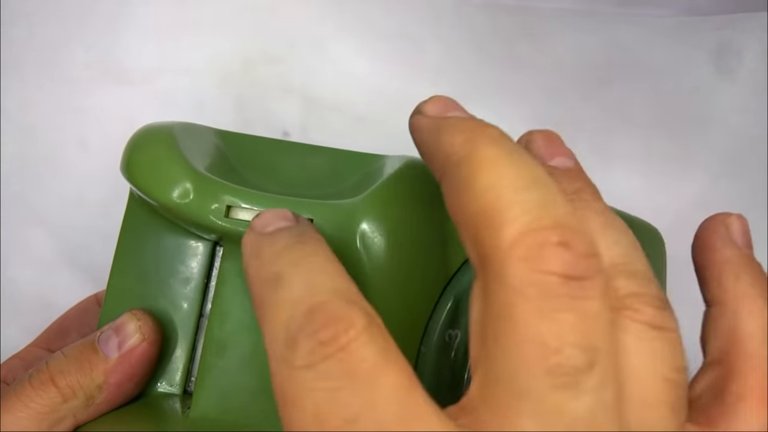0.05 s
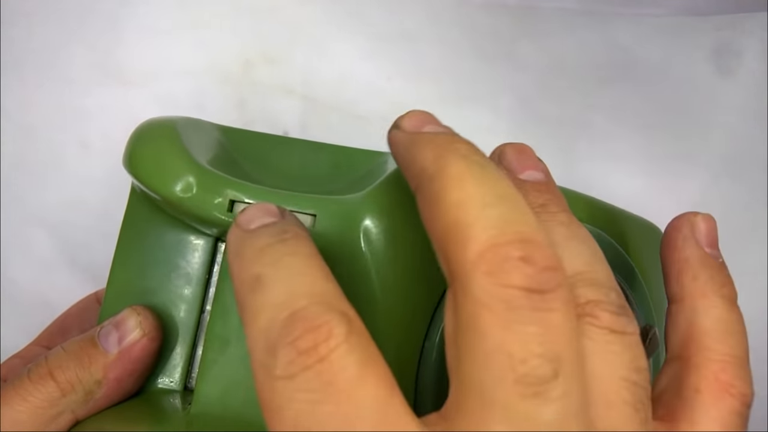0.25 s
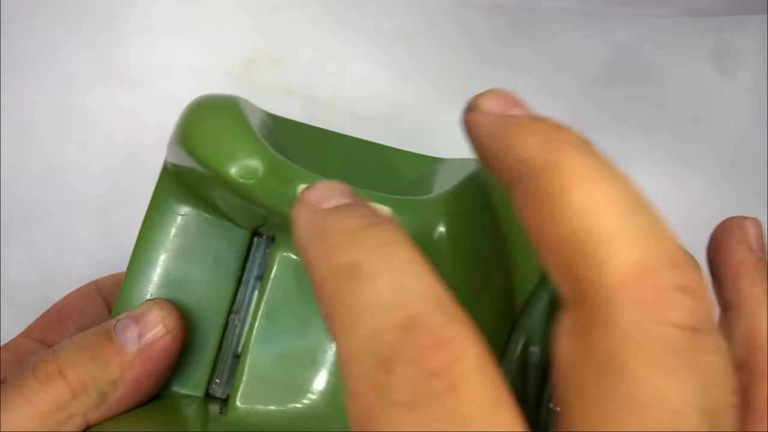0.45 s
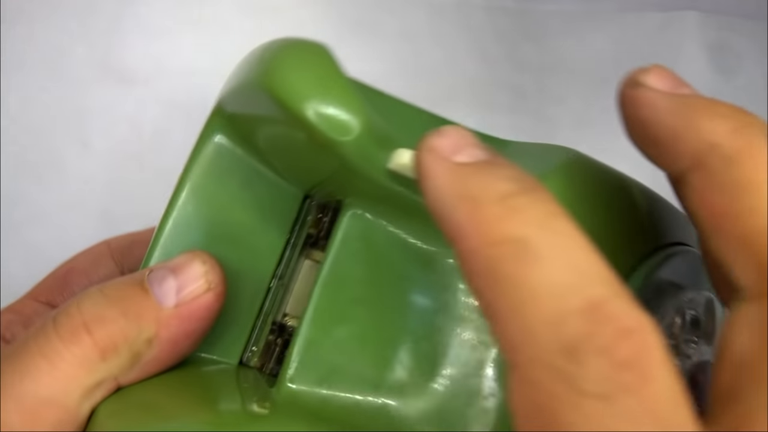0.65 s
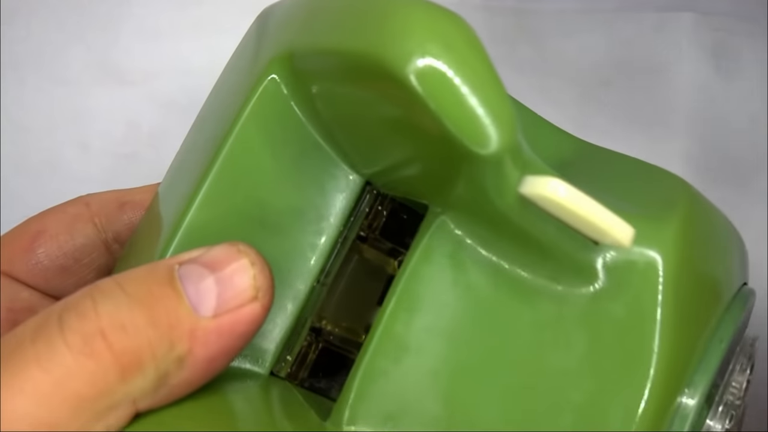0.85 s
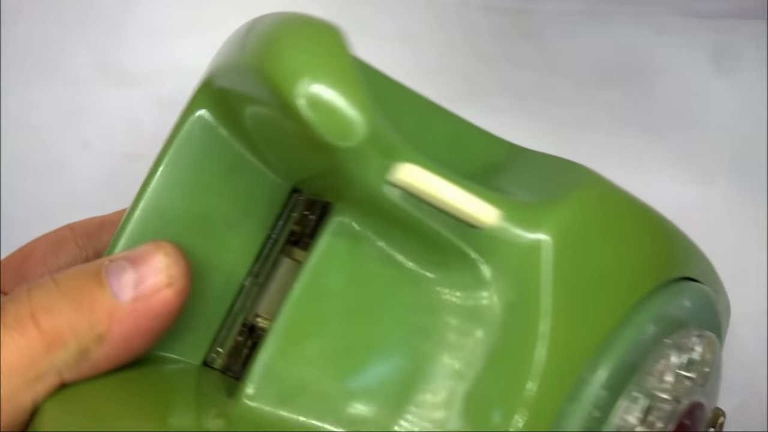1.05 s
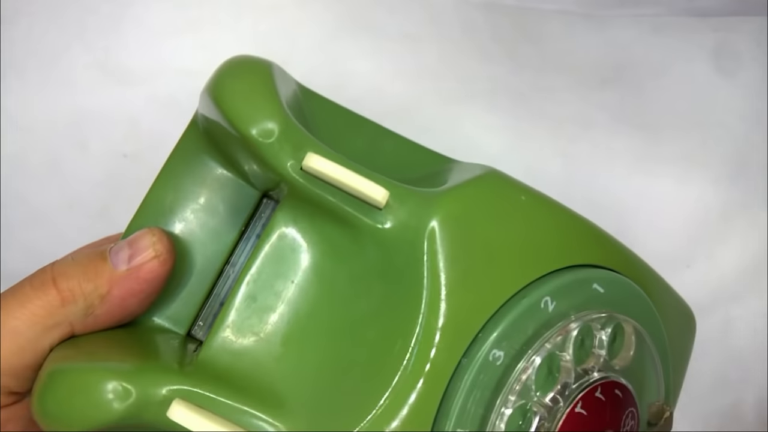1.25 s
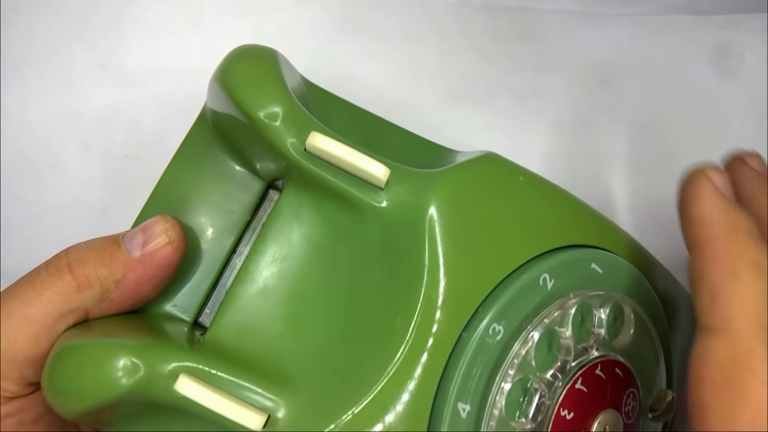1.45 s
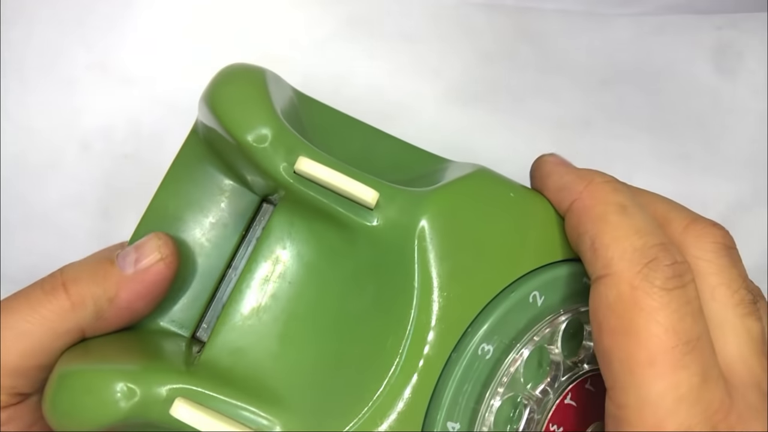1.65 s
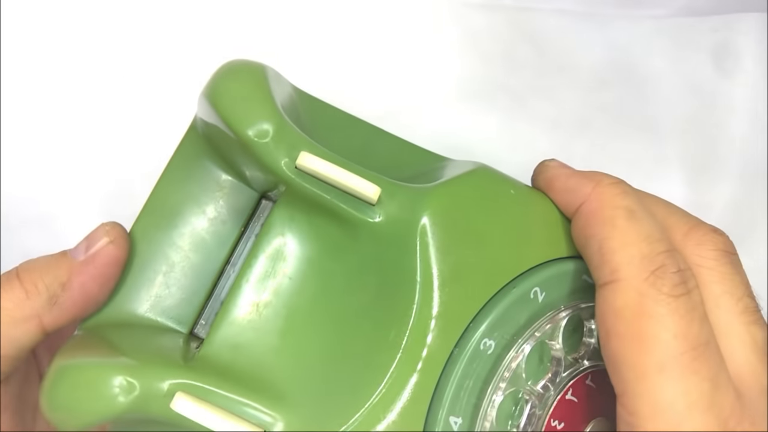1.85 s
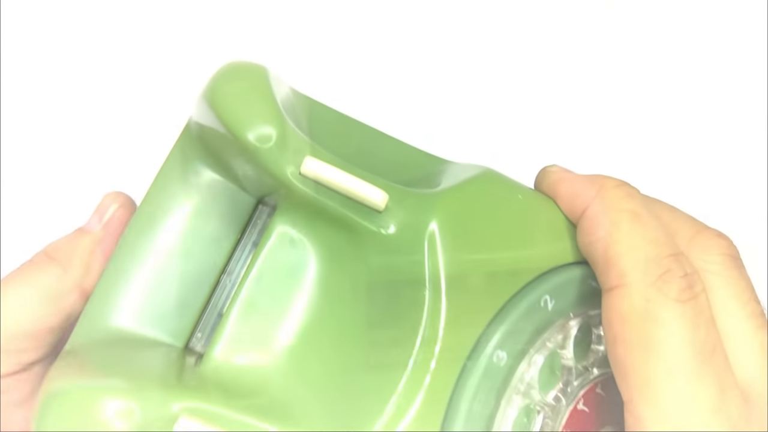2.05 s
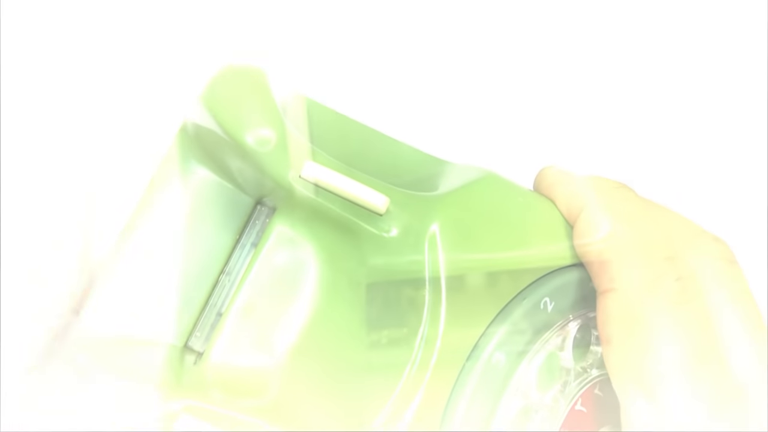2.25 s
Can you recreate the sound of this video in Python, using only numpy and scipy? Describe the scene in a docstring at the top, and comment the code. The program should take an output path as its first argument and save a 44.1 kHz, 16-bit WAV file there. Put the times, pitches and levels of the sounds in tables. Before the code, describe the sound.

Hollow plastic clacks of an old telephone's cradle switch, then light handling ticks and rubs.

```python
"""Hollow plastic clacks, close by in a small room: a finger works an old telephone's cradle switch.
The plunger slides and clacks, the lever snaps against its stop, and the shell, its cavity and the
return spring ring in their damped modes. Then the hands shift their grip: skin rubs over the case
in tiny slips, and the case ticks, creaks, bumps and clacks on its base. A low hum lies underneath."""
import sys
import numpy as np
from scipy import signal
from scipy.fft import rfft, irfft
from scipy.io import wavfile
from scipy.ndimage import uniform_filter1d

SR = 44100
rng = np.random.default_rng(int(sys.argv[2]) if len(sys.argv) > 2 else 0)


def unload_wav(signal):
    """Save mono or channel-first audio to the path in sys.argv[1] as 16-bit WAV at rate SR, clipped to [-1, 1]."""
    wavfile.write(
        sys.argv[1],
        SR,
        np.round(np.clip(np.atleast_2d(signal).T, -1, 1) * 32767).astype(np.int16),
    )


N = 105840

# Sharp resonances of the plunger and of the case. Each row: centre in Hz, width in Hz, lift in dB.
PLUNGER_RESONANCES = [(1802, 75, 6), (2060, 26, 5.5), (3016, 190, 5.5), (3510, 190, 4.5), (4724, 130, 8),
                      (6500, 310, 4), (9520, 450, 4)]
CASE_RESONANCES = [(1000, 120, 3), (1573, 90, 5.5), (1970, 84, 1.5), (3305, 230, 2), (4380, 150, 5),
                   (5000, 300, 5.5), (5920, 140, 2)]


def undb(db):
    """Amplitude grows tenfold for every 20 dB."""
    return 10 ** (np.asarray(db) / 20)


def unit(x):
    """Normalisation to an rms of 1."""
    return x / np.sqrt(np.mean(x ** 2))


def envelope(points):
    """Gain over time, interpolated in decibels. Each row: time in seconds, level in dB."""
    return undb(np.interp(np.arange(N) / SR, *np.array(points).T))


def spectrum_db(points, size):
    """Spectral envelope, interpolated in log frequency. Each row: frequency in Hz, level in dB."""
    hz, db = np.array(points).T
    return np.interp(np.log(np.fft.rfftfreq(size, 1 / SR) + 1), np.log(hz), db)


def resonance_db(peaks, size):
    """Each resonance lifts the spectrum in a bell around its centre."""
    hz = np.fft.rfftfreq(size, 1 / SR)
    return sum(lift / (1 + (2 * (hz - centre) / width) ** 2) for centre, width, lift in peaks)


def colour(x, db):
    """Minimum-phase filtering: folding the cepstrum makes the given dB per bin a causal response."""
    size = x.shape[-1]
    cepstrum = irfft(np.log(undb(db)), size)
    cepstrum[..., 1:size // 2] *= 2
    cepstrum[..., size // 2 + 1:] = 0
    return irfft(rfft(x) * np.exp(rfft(cepstrum)), size)


def spread(x, wide_hz):
    """Coherence falls with frequency: two noises become alike in the bass, unrelated above wide_hz."""
    mid, side = rfft(x)
    width = np.clip((np.fft.rfftfreq(x.shape[-1], 1 / SR) / wide_hz) ** 2, .22, 1)
    left_right = np.array([mid + width * side, mid - width * side])
    return irfft(left_right / np.sqrt(1 + width ** 2), x.shape[-1])


def strikes(rows, spectrum, peaks, rise_ms, tail_db, tail_ms, wide_hz, treble_left_db):
    """An impact excites dense, quickly damped modes: a noise burst with a weaker, longer tail.
    Each row: start in seconds, level in dB, bass, low mid, presence and treble in dB,
    left over right in dB, decay time in ms."""
    size, level_window_s, treble_decay_ms = 4096, .01, 7
    band_hz = [450, 1050, 2500, 5600, 11000]  # bass, low mid, unaltered middle, presence and treble, in Hz
    out = np.zeros((2, N + size))
    ms, hz = np.arange(size) / SR * 1000, np.fft.rfftfreq(size, 1 / SR)
    sides = np.array([[.5], [-.5]])
    treble_share = np.minimum(hz / band_hz[-1], 1)
    body_db = spectrum_db(spectrum, size) + resonance_db(peaks, size)
    body_db = body_db + sides * treble_left_db * treble_share ** 2
    for start_s, db, bass, low_mid, presence, treble, pan_db, decay_ms in rows:
        decay = np.exp(-np.maximum(ms - rise_ms, 0) / max(decay_ms, .3))
        tail = undb(tail_db) * np.exp(-ms / tail_ms)
        contour = np.minimum(ms / rise_ms, 1) * (decay + tail)
        burst = rfft(spread(rng.standard_normal((2, size)), wide_hz) * contour)
        power = uniform_filter1d(abs(burst) ** 2, size=36, axis=-1)
        white = irfft(burst / np.sqrt(power)) * (ms < ms[-1] / 2)
        brief = unit(white * np.exp(-ms / treble_decay_ms)) * np.std(white)  # high modes die first
        excitation = irfft(rfft(white) * (1 - treble_share) + rfft(brief) * treble_share)
        tone_db = spectrum_db(list(zip(band_hz, (bass, low_mid, 0, presence, treble))), size)
        hit = colour(excitation, body_db + tone_db + sides * pan_db * np.minimum(hz / wide_hz, 1))
        start = int(start_s * SR)
        out[:, start:start + size] += unit(hit) * undb(db) * np.sqrt(level_window_s * SR / size)
    return out[:, :N]


def friction(levels, spectrum, peaks, grain_db, grains_per_s, wide_hz):
    """Stick-slip friction: tiny slips of uneven strength, filtered by the plastic's resonances."""
    step = max(int(SR / grains_per_s), 1)
    slips = undb(grain_db * np.minimum(rng.exponential(size=N), 4))[np.arange(N) // step]
    grains = spread(rng.standard_normal((2, N)), wide_hz) * slips
    return unit(colour(grains, spectrum_db(spectrum, N) + resonance_db(peaks, N))) * envelope(levels)


def ring(modes, start_s, gains, skew_rad, rise_s):
    """Free vibration: each mode is a decaying sine with a random phase between left and right.
    Each row: frequency in Hz, level in dB, time to fall 60 dB in seconds."""
    t = np.arange(12000) / SR
    sound = np.zeros((2, len(t)))
    gains = np.broadcast_to(gains, len(modes))
    for (hz, db, t60), gain, lag in zip(modes, gains, rng.standard_normal(len(modes))):
        phase = np.array([[1], [-1]]) * lag * skew_rad
        sound += gain * undb(db - 60 * t / t60) * np.sin(2 * np.pi * hz * t + phase)
    attack = 1 - np.exp(-t / rise_s)
    return np.pad(sound * attack, ((0, 0), (int(start_s * SR), N)))[:, :N]


def coupling(modes, favoured_hz, width_oct):
    """Selective excitation: a contact drives most strongly the modes near its favoured pitch."""
    return 1 / (1 + (np.log2(modes[:, 0] / favoured_hz) / width_oct) ** 2)


def background():
    """Superposition of a pure low hum, a rumble and a faint hiss, each swelling and sinking."""
    # Each row: time in seconds, level in dB.
    hum_levels = [(0, -59), (.4, -53), (1.05, -63), (1.21, -61.5), (1.32, -51.5), (1.62, -52),
                  (1.77, -46.5), (1.95, -57), (2.4, -58)]
    rumble_levels = [(0, -64), (.15, -50), (.96, -63), (1.2, -56.5), (1.32, -52.5), (1.55, -54.5),
                     (1.78, -50.5), (2.4, -56)]
    hiss_levels = [(0, -49), (.08, -58), (.16, -75), (.8, -56), (1.1, -56), (1.16, -70), (1.25, -68),
                   (1.4, -56), (1.52, -64), (2.2, -53), (2.4, -87)]
    # Each row: frequency in Hz, level in dB.
    rumble_spectrum = [(20, -38), (33, -28), (46, 5), (56, -8), (88, 1.5), (110, 3), (135, -0.5), (180, -2),
                       (300, -8.5), (1000, -28), (16000, -91.5)]
    hiss_spectrum = [(30, -2), (200, -0.5), (600, -0.5), (2000, -31.5), (5000, -9), (10000, -12.5),
                     (16000, -29)]
    hum_hz = 64.4
    out = envelope(hum_levels) * unit(np.sin(2 * np.pi * hum_hz * np.arange(N) / SR))
    for levels, spectrum in (rumble_levels, rumble_spectrum), (hiss_levels, hiss_spectrum):
        noise = spread(rng.standard_normal((2, N)), wide_hz=167)
        out = out + envelope(levels) * unit(colour(noise, spectrum_db(spectrum, N)))
    return out


def room(direct):
    """Reverberation: a small room's reflections build into a diffuse tail that decays exponentially."""
    spectrum = [(100, 9.5), (500, 2.5), (1200, -4), (3200, -4.5), (7000, -5.5), (16000, -11)]  # Each row: frequency in Hz, level in dB.
    t60_s, build_s, send_db = 0.2, 0.015, -13.5
    t = np.arange(2 ** 14) / SR
    tail = rng.standard_normal((2, len(t))) * undb(-60 * t / t60_s) * np.minimum(t / build_s, 1) ** 2
    tail = spread(unit(tail), wide_hz=1002) / np.sqrt(len(t))
    response = colour(tail, spectrum_db(spectrum, len(t)))
    return direct + undb(send_db) * signal.fftconvolve(direct, response, axes=-1)[:, :N]


def skin_rub():
    """Sliding friction of skin over the case."""
    levels = [(.84, -53), (.88, -47.5), (.97, -44.5), (1.06, -52), (1.13, -68), (1.252, -72.5),
              (1.268, -43), (1.305, -34), (1.34, -44.5), (1.385, -46), (1.415, -36.5), (1.45, -58),
              (1.54, -62), (1.63, -47), (1.75, -42), (1.805, -56), (1.843, -28), (1.88, -59), (1.92, -43),
              (1.95, -34.5), (1.99, -49), (2.08, -48), (2.12, -29.5), (2.17, -43), (2.22, -49),
              (2.4, -62.5)]  # Each row: time in seconds, level in dB.
    spectrum = [(100, -3.5), (400, -5), (1000, -3.5), (2300, -3), (4800, -4), (7000, -6.5), (10000, -10.5),
                (16000, -22)]  # Each row: frequency in Hz, level in dB.
    return friction(levels, spectrum, CASE_RESONANCES, grain_db=3, grains_per_s=820, wide_hz=1310)


def bumps():
    """As its weight shifts, the whole telephone thuds like a single damped oscillator."""
    thuds = [(.112, -44, 149.3), (.155, -38, 100), (0.659, -44.5, 174), (1.37, -39.5, 84),
             (1.419, -54, 131), (1.745, -39, 140), (1.86, -45, 133), (1.962, -38.5, 127.4),
             (2.108, -39, 147)]  # Each row: start in seconds, level in dB, pitch in Hz.
    t60_s = 0.16
    return sum(ring([(hz, db, t60_s)], s, 1, skew_rad=0.23, rise_s=0.0045) for s, db, hz in thuds)


def rim_creaks():
    """Stick-slip under the grip: each slip rings the stiff rim, slightly detuned by the pressure."""
    rim_modes = [(3800, -8, .03), (4220, 1, 0.029), (4330, -3, 0.025), (4964, 0.5, 0.027),
                 (4950, -3.5, .024), (5820, 0, 0.022)]  # Each row: frequency in Hz, level in dB, T60 in seconds.
    slips = [(1.297, -23.5, 4900), (1.3075, -21, 4800), (1.319, -24, 4230), (1.8345, -18.5, 5230),
             (1.911, -31, 5560)]  # Each row: start in seconds, level in dB, favoured pitch in Hz.
    detune = .012
    out = np.zeros((2, N))
    for start_s, db, favoured_hz in slips:
        modes = np.array(rim_modes)
        modes[:, 0] *= 1 + detune * rng.standard_normal(len(modes))
        gains = undb(db) * coupling(modes, favoured_hz, width_oct=0.17)
        out += ring(modes, start_s, gains, skew_rad=0.72, rise_s=0.00047)
    return out


def case_impacts():
    """Impact excitation under the hands: loose parts tick, the case knocks, the cover hits its base."""
    # Each row: start in seconds, level, four tone bands and balance in dB, decay in ms.
    tick_hits = [(.8745,-35.5,-8,6,6.5,-12,-16,14), (.887,-37.5,10,8.5,7,8.5,-4,4.6),
                 (.9298,-46.5,-8,13,2,11,1,1.3), (.9591,-39,-18,-25,-29,-16,-5,3.7),
                 (.9751,-38,-11,5,19,13,-4,1), (1.042,-37.5,-15.5,-9,9.5,9,-3,3.7),
                 (1.2965,-30,10,13,9,11,0.5,1.8), (1.3069,-27.5,8,9,13,3,-12,2.2),
                 (1.3185,-25.5,5,9.5,5,15.5,-1,2.2), (1.3984,-39,-8,-8,5,-23,-6,3.3),
                 (1.4167,-37.5,5,0,-4,-5,-1,2.3), (1.569,-43,3,-31,-9,6.5,2,0.46),
                 (1.5849,-42.5,0,-9,2,9,-1,1.5), (1.6094,-41,1,-1,13,12,1.5,1.4),
                 (1.6302,-41,13,0,-8,-11,-3,0.92), (1.6455,-43.5,10,0,-11,-10,0,2),
                 (1.6591,-33.5,6,-2,-3,5.5,-0.5,2.3), (1.6635,-49,2,-1,0,7,0,1.2),
                 (1.6873,-34.5,11.5,1,-7,1,-1,1.6), (1.6975,-39.5,-1,8,-1,-3,-6,1.3),
                 (1.7078,-37.5,12,2,-22,-15,7,2.7), (1.715,-47,16,10,-16,-9,0,1.5),
                 (1.7305,-33.5,12,3,-10,-0.5,-4,1.8), (1.7462,-36,-1,7,-11.5,-9,6,1.2),
                 (1.7806,-29.5,-2,-5,-6,-3,-4,1.2), (1.8308,-36,-14,-10,1,3,-7,1.5),
                 (1.8348,-24,-8,-12,6.5,5,-8,2.1), (1.838,-30,-8,2,4,4,-2,3.6),
                 (1.9107,-26.5,-27,-3,8.5,5,-5.5,2.3), (1.9332,-32.5,-18,-11,-3,-1,-4,3.1),
                 (1.9582,-34.5,3,-3,1,-2,-1,1.3), (2.0143,-38.5,18,-10,7,7,10,1.3),
                 (2.0347,-41.5,-8,-6,-9,-8,-7,1.1), (2.0908,-25.5,3,-13,7,11.5,1,2.2),
                 (2.1338,-34,9.5,-2,-26,-5,-5,1.1), (2.1583,-37,17.5,6,-4,5,-8,2.6),
                 (2.3508,-48,16,7,-1,4.5,-1,3.1)]
    knock_hits = [(1.7418,-31.5,-7,-2,5,2,-0.5,1.6), (1.7547,-29,14,12.5,-7,13,5,3.4),
                  (1.7644,-32,5.5,-16,-1,0,-8,4.4), (1.9543,-25.5,-31,4.5,-6,-12,2,1.6),
                  (2.1731,-39.5,3,2,0,-2,-14,1.4), (2.2405,-45.5,3,-13,-2,1,-2,9.8)]
    cover_hits = [(2.1022, -30, -2, 6, -11, -2, -1, 1.3), (2.1145, -16.5, -4.5, 1.5, 0, 0.5, -2, 1.8)]
    # Each row: frequency in Hz, level in dB.
    tick_spectrum = [(120, -26), (450, -11.5), (1000, -6), (1400, -6.5), (1950, -7.5), (2600, -5.5),
                     (3400, -1.5), (4700, -1.5), (6000, -1), (7300, -4), (10000, -6.5), (13000, -21.5),
                     (16000, -31)]
    knock_spectrum = [(100, -23), (300, 0.5), (700, -0.5), (1050, 1.5), (1600, 0), (2500, -6), (5000, -11),
                      (9000, -17.5), (16000, -44)]
    cover_spectrum = [(120, -19), (450, -14.5), (1100, -10.5), (2500, -6), (4000, -3.5), (7000, -11.5),
                      (10000, -14), (13000, -22), (16000, -30)]
    cover_resonances = [(1680, 120, 9.5), (2010, 200, 12.5), (3010, 140, 3), (3340, 310, 8), (4650, 300, 9),
                        (5770, 210, 9.5), (8450, 790, 7.5)]  # Each row: centre in Hz, width in Hz, lift in dB.
    ticks = strikes(tick_hits, tick_spectrum, CASE_RESONANCES,
                    rise_ms=0.35, tail_db=-9, tail_ms=13, wide_hz=1390, treble_left_db=7.5)
    knocks = strikes(knock_hits, knock_spectrum, CASE_RESONANCES[:1],
                     rise_ms=0.18, tail_db=-20, tail_ms=7.8, wide_hz=1610, treble_left_db=9)
    cover = strikes(cover_hits, cover_spectrum, cover_resonances,
                    rise_ms=0.34, tail_db=-8.5, tail_ms=6.5, wide_hz=1370, treble_left_db=4.5)
    return ticks + knocks + cover


def plunger_slide():
    """Sliding friction of the plunger and of the finger on it."""
    levels = [(.07, -67), (.087, -39.5), (.11, -29.5), (.128, -42.5), (.17, -64), (.197, -24), (.24, -38),
              (.27, -44.5), (.31, -37), (.36, -44), (.395, -26.5), (.44, -33.5), (.505, -42), (.56, -33.5),
              (.63, -39), (.68, -41), (.74, -35.5), (.8, -69.5)]  # Each row: time in seconds, level in dB.
    spectrum = [(100, -23), (240, -13.5), (480, 1.5), (800, -5), (1500, -9.5), (3100, -9.5), (4200, -14),
                (9000, -21), (16000, -34)]  # Each row: frequency in Hz, level in dB.
    return friction(levels, spectrum, PLUNGER_RESONANCES, grain_db=2.5, grains_per_s=470, wide_hz=1400)


def spring():
    """The return spring vibrates freely after each jolt."""
    modes = [(1798, -11, .11), (2080, -9.5, .12), (2774, -11, .13), (3050, -4, 0.085), (3450, 4, 0.095),
             (3740, -8.5, .1)]  # Each row: frequency in Hz, level in dB, T60 in seconds.
    jolts = [(.207, -30), (0.236, -33.5), (.372, -37), (0.416, -29), (0.542, -44), (0.573, -46.5),
             (0.695, -50), (.727, -44)]  # Each row: start in seconds, level in dB.
    return sum(ring(modes, s, undb(db), skew_rad=0.72, rise_s=.001) for s, db in jolts)


def cavity():
    """Cavity resonance: the hollow booms at a steady pitch when the plunger bottoms out."""
    modes = [(299.5, -3.5, .3), (387.7, 2, 0.2)]  # Each row: frequency in Hz, level in dB, T60 in seconds.
    booms = [(.214, -30), (.32, -42.5), (.398, -32), (.549, -31), (.727, -43)]  # Each row: start in seconds, level in dB.
    return sum(ring(modes, s, undb(db), skew_rad=0.31, rise_s=0.0037) for s, db in booms)


def shell():
    """Each push excites the modes of the walls, which the grip bends towards that push's pitch."""
    wall_modes = [(439, -9.5, 0.14), (491, -11, 0.14), (512.6, 9.5, 0.089), (550, -14, 0.096),
                  (626, -4, 0.079), (673, -7.5, 0.12), (780, -7.5, 0.098), (1180, -13.5, .11)]  # Each row: unbent frequency in Hz, level in dB, T60 in seconds.
    pushes = [(.085, -43.5, 428), (.11, -44, 560), (.2075, -26.5, 527.7), (.239, -38, 480),
              (.311, -36, 472), (.372, -33.5, 517), (.403, -31, 509.6), (.466, -42, 476), (.475, -50, 630),
              (.544, -28.5, 533), (.615, -40, 508), (0.653, -40, 588), (0.662, -42.5, 426),
              (.693, -37.5, 492), (.727, -34, 556), (.764, -53, 537)]  # Each row: start in seconds, level in dB, favoured pitch in Hz.
    unbent_hz, grip_bend = 520, .7
    out = np.zeros((2, N))
    for start_s, db, favoured_hz in pushes:
        modes = np.array(wall_modes)
        modes[:, 0] *= (favoured_hz / unbent_hz) ** grip_bend
        gains = undb(db) * coupling(modes, favoured_hz, width_oct=0.41)
        out += ring(modes, start_s, gains, skew_rad=.15, rise_s=0.0016)
    return out


def cradle_switch():
    """Impact and free decay: the plunger clacks, the lever hits its stop, the resonators ring on."""
    # Each row: start in seconds, level, four tone bands and balance in dB, decay in ms.
    plunger_hits = [(.0835,-40.5,14,20,-8,0,-1,1.6), (.1065,-38.5,16,0,-9,3,-2,3),
                    (.1782,-31,-7,-1,-2,-23,-2,1.8), (.2057,-12,3,2.5,3.5,0.5,0,4),
                    (.2365,-33,-11,-6,3,1,-8,3), (.2572,-33,4,2,-4,-10,-15,1.9),
                    (.2811,-36,9,-13,2,-15,-4,3.3), (.3095,-35.5,6,8,0,-17,0,2),
                    (.3397,-33,-3,8,9,-12,-0.5,1.8), (.3705,-18,-13,7.5,3,-4,-3,1.5),
                    (.3976,-26.5,-2,6,3,-8,5,2.2), (.416,-30.5,12.5,-4,3,-15,-9,1.9),
                    (.4296,-30,-21,-5,0,-20,-8,3.7), (.4634,-36,-4,13,11,3,-5,3.3),
                    (.5153,-28,-21,5,-5,-22,-1,7.6), (.5398,-18.5,-4.5,10,5.5,2,-2.5,5.4),
                    (.5492,-20.5,7,-5,-5,-15,7,2.5), (.592,-33.5,-15.5,13,11,3.5,-1,3),
                    (.6131,-34.5,3,0.5,1,-1,-3,3), (.6497,-31,11.5,-1,-17,-23,1,7.4),
                    (.6914,-20.5,2.5,4,-2.5,0.5,-2.5,6.5), (.7251,-31.5,9,-6,8,-4.5,0.5,2),
                    (.764,-30.5,-3.5,-2,-13,-24,1.5,3.6)]
    lever_hits = [(0.2217, -18, 1.5, 6, -10, 4.5, 2.9, 1.2), (0.4026, -21, 4, 3, 2.5, -21, 1.2, 0.75),
                  (0.4054, -17.5, -11, 5.5, -1, 3.5, 3, 1.3), (0.5589, -20.5, -4, -11, -4.5, 4, 2.2, 1.1)]
    # Each row: frequency in Hz, level in dB.
    plunger_spectrum = [(120, -47.5), (280, -14.5), (500, -1), (900, -8.5), (1300, -12.5), (1850, 1.5),
                        (2450, -3), (3100, -2), (4000, -6.5), (5500, -12), (10000, -12), (12500, -15),
                        (16000, -28)]
    lever_spectrum = [(120, -47), (350, -6.5), (550, -11.5), (1000, -14.5), (1400, -17.5), (2000, -20),
                      (2700, 1.5), (3700, -8.5), (5000, -4), (7000, -13), (10000, -21.5), (16000, -38.5)]
    # The ringing is damped as the finger lets go. Each row: time in seconds, gain in dB.
    damping = [(.775, 2), (.8, -10), (.86, -16)]
    clacks = strikes(plunger_hits, plunger_spectrum, PLUNGER_RESONANCES,
                     rise_ms=0.94, tail_db=-4, tail_ms=9.3, wide_hz=1510, treble_left_db=9.5)
    snaps = strikes(lever_hits, lever_spectrum, PLUNGER_RESONANCES[:2],
                    rise_ms=0.7, tail_db=-11, tail_ms=5.6, wide_hz=3000, treble_left_db=2.5)
    ringing = (cavity() + shell() + spring()) * envelope(damping)
    return clacks + snaps + ringing + plunger_slide()


def scene():
    """Superposition: the telephone's sounds add and reverberate over the background."""
    telephone = cradle_switch() + case_impacts() + rim_creaks() + bumps() + skin_rub()
    return room(telephone) + background()


def record(dry):
    """Clipping and band limiting: peaks stop at full scale, then a steep low-pass cuts the top."""
    top_hz = 16100
    low_pass = signal.ellip(8, .2, 70, top_hz, fs=SR, output="sos")
    return signal.sosfilt(low_pass, np.clip(dry, -1, 1))


dry = scene()
out = record(dry)
unload_wav(out)
```